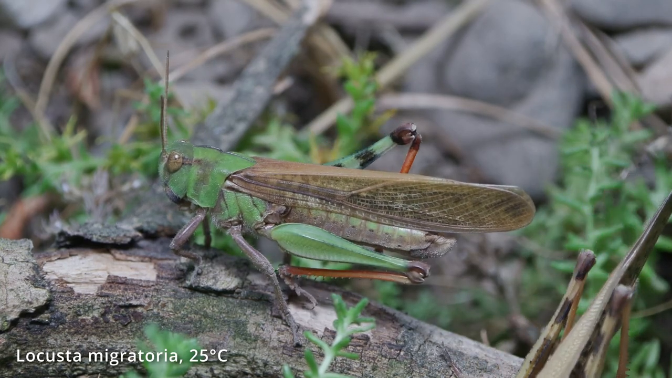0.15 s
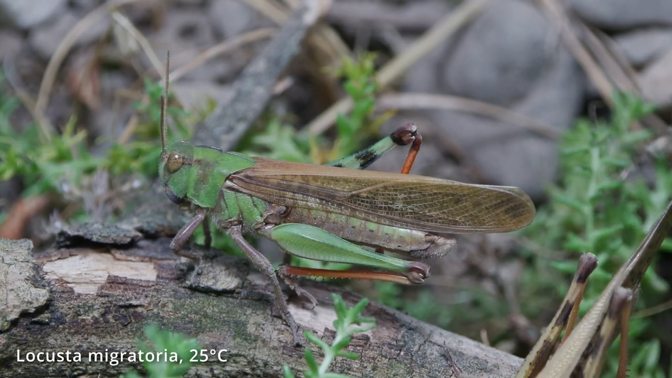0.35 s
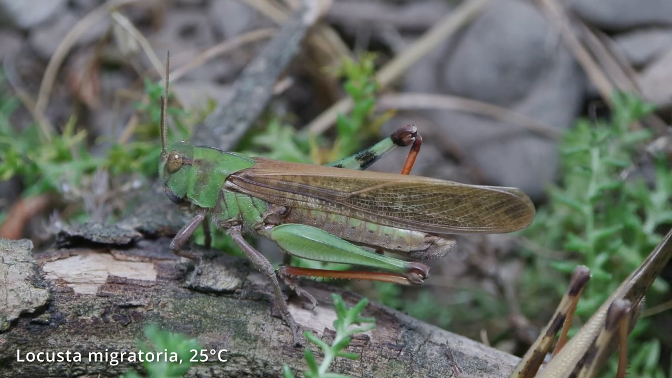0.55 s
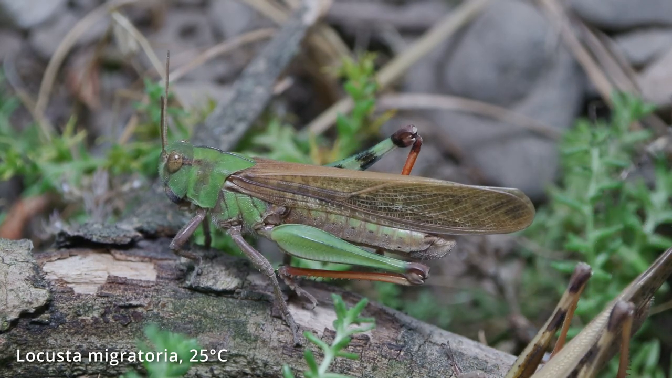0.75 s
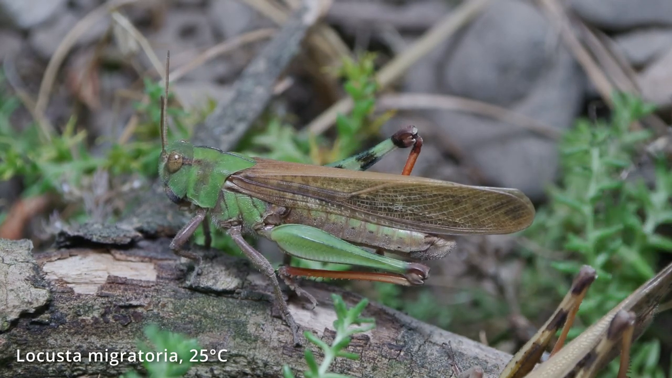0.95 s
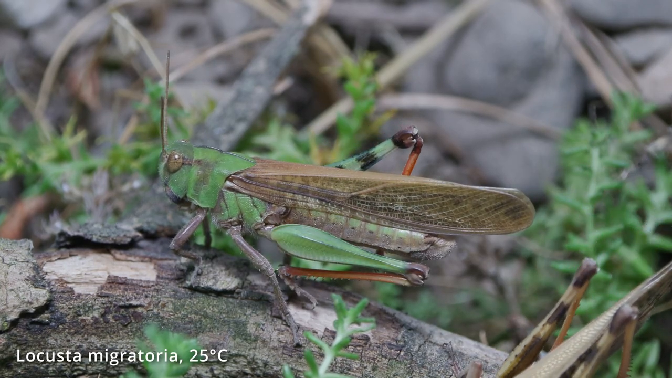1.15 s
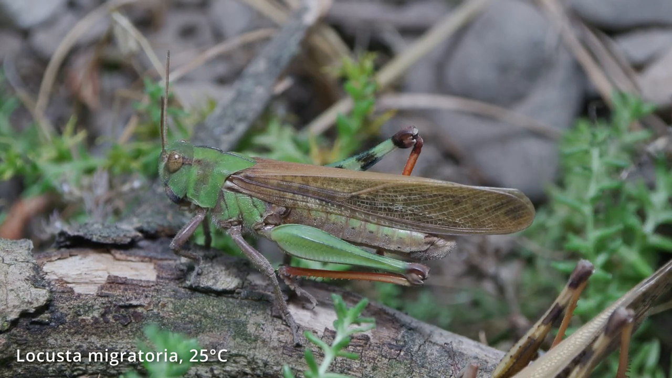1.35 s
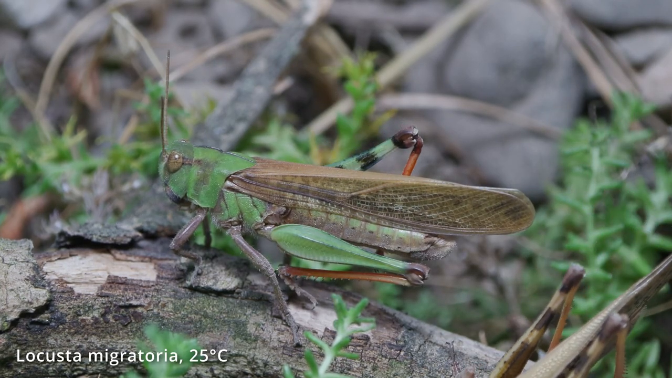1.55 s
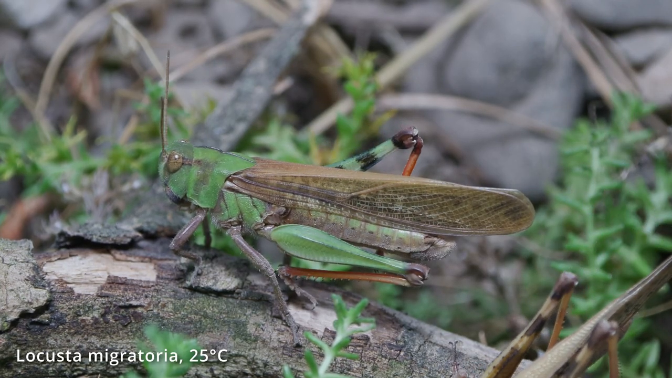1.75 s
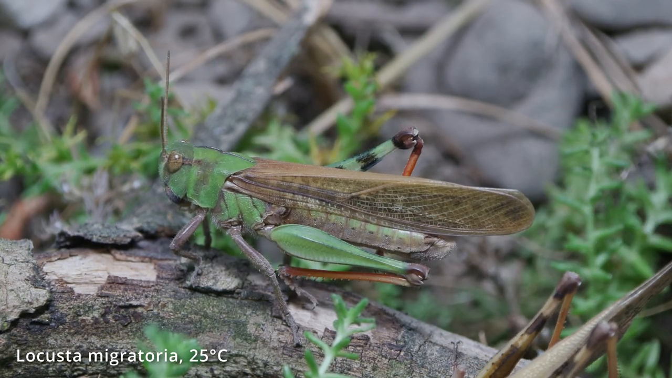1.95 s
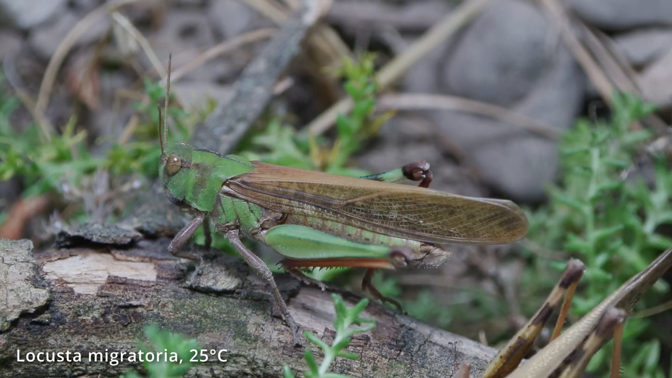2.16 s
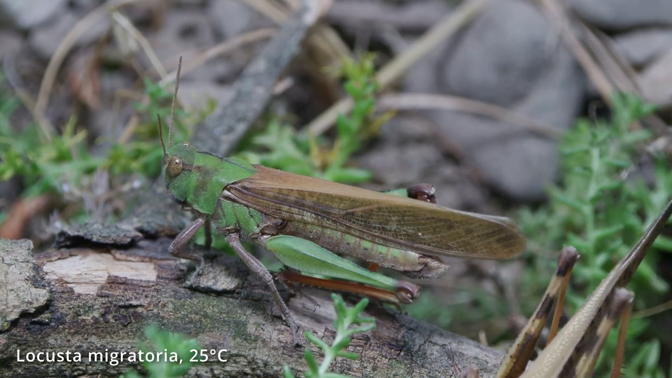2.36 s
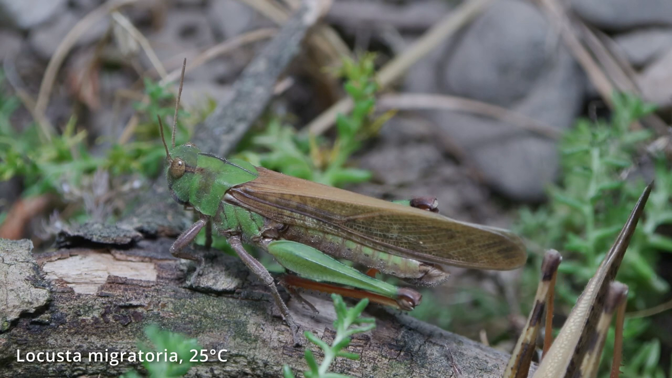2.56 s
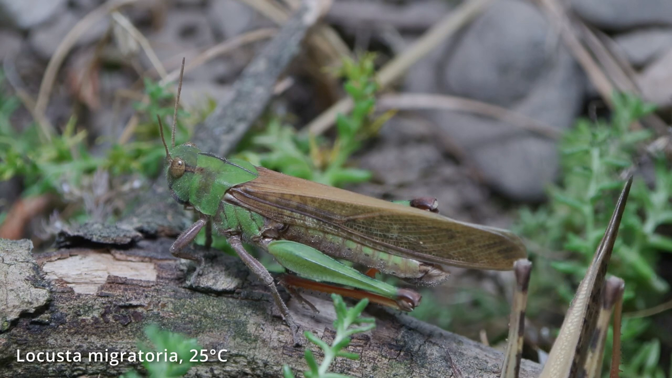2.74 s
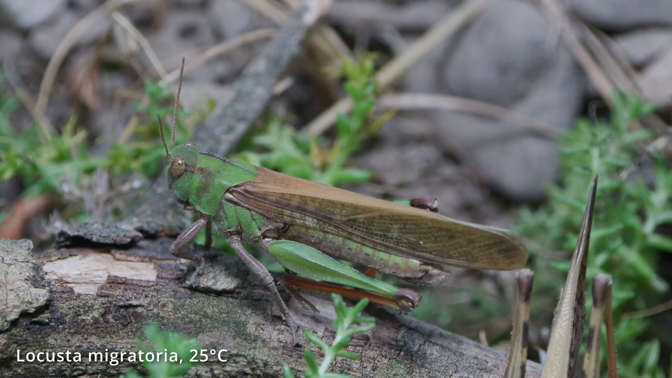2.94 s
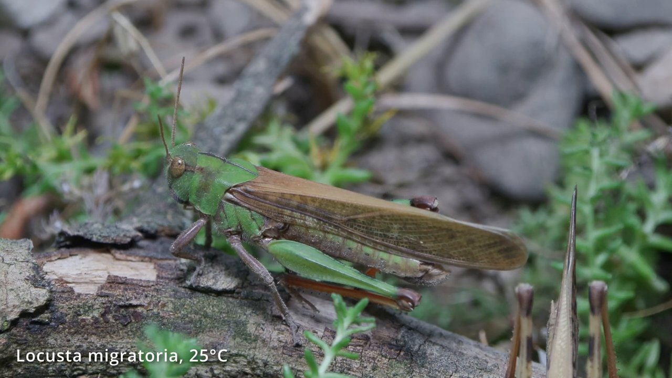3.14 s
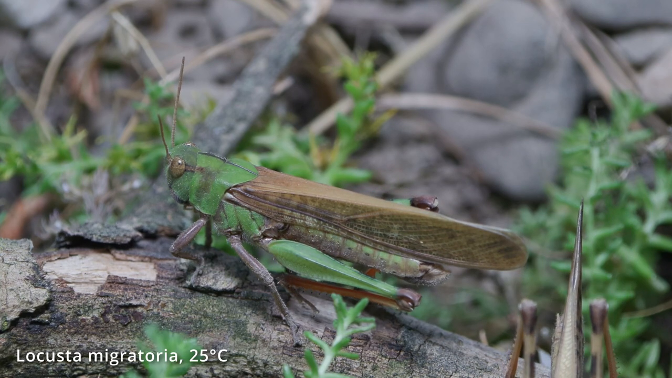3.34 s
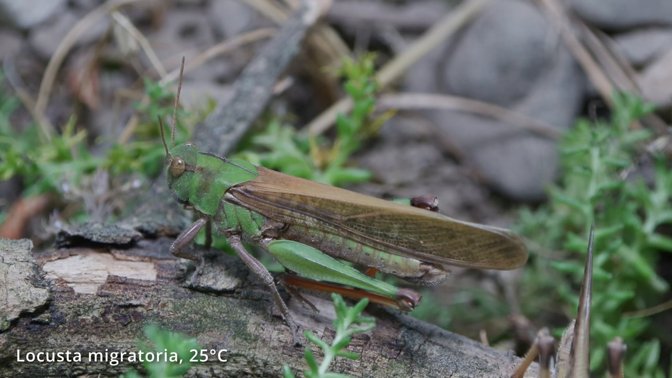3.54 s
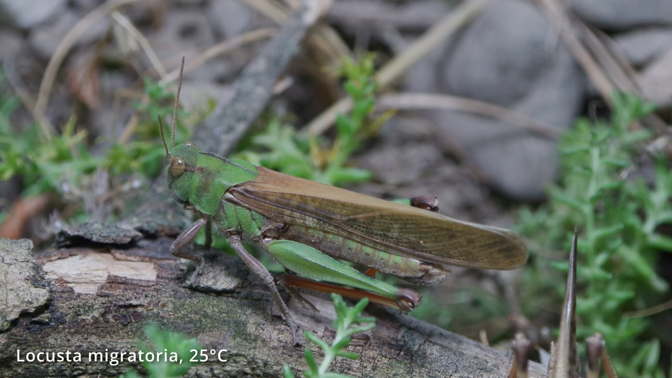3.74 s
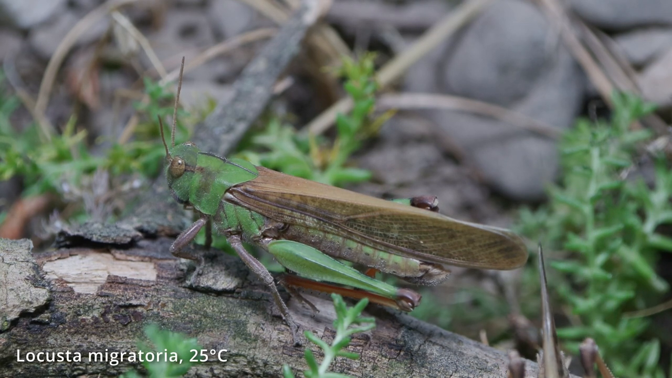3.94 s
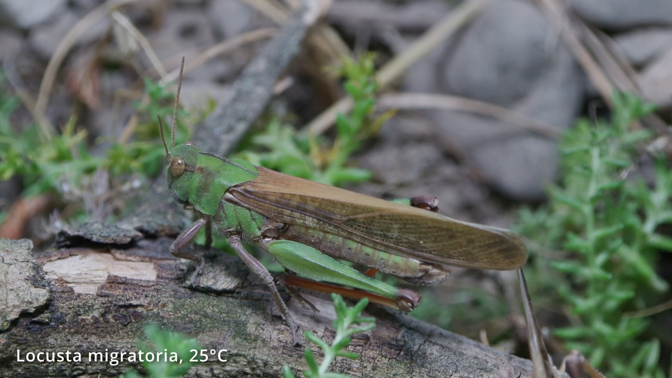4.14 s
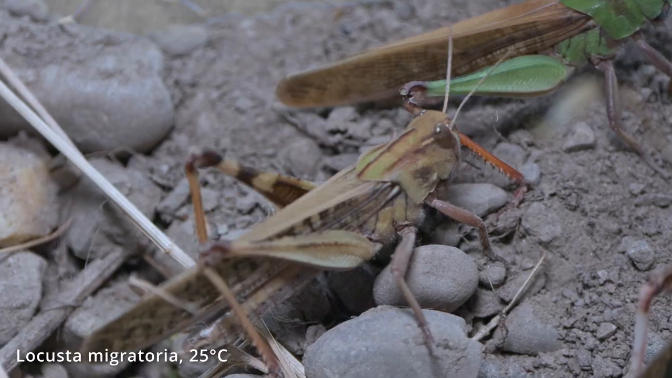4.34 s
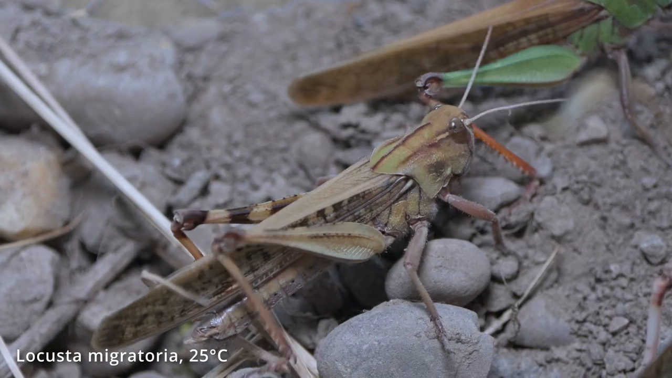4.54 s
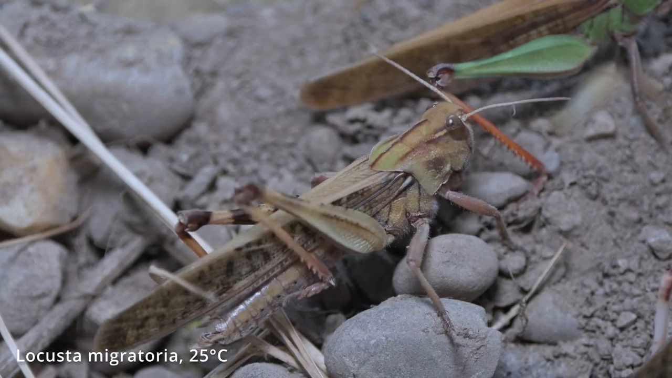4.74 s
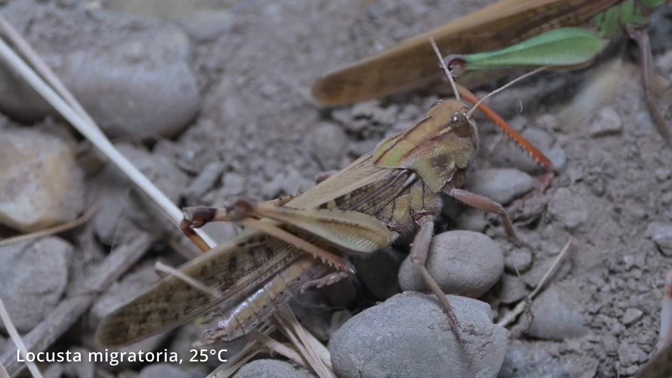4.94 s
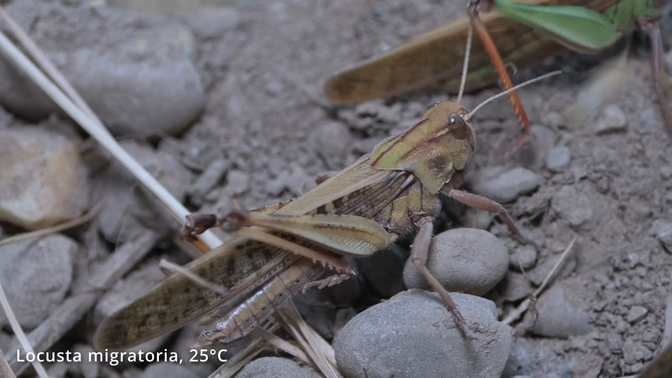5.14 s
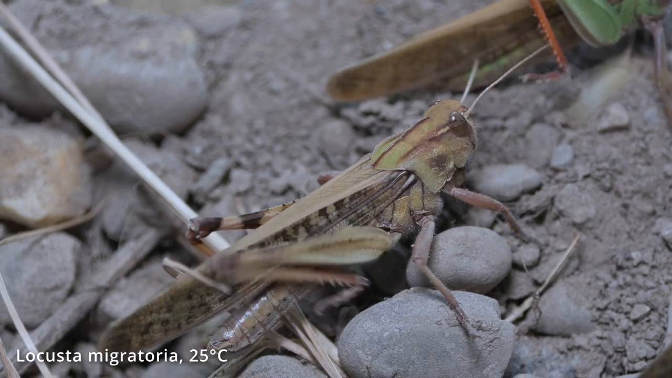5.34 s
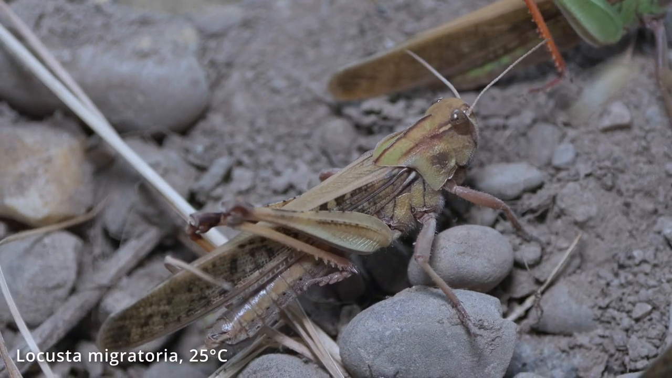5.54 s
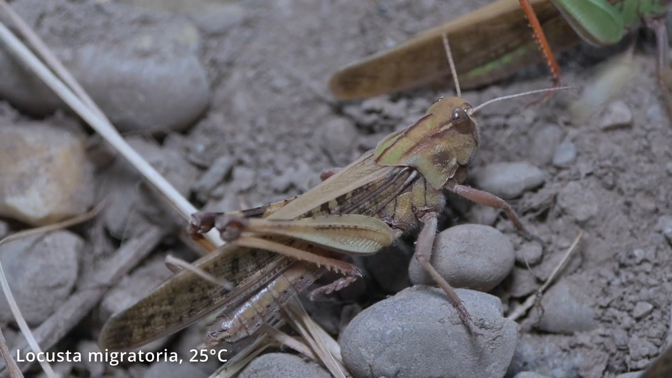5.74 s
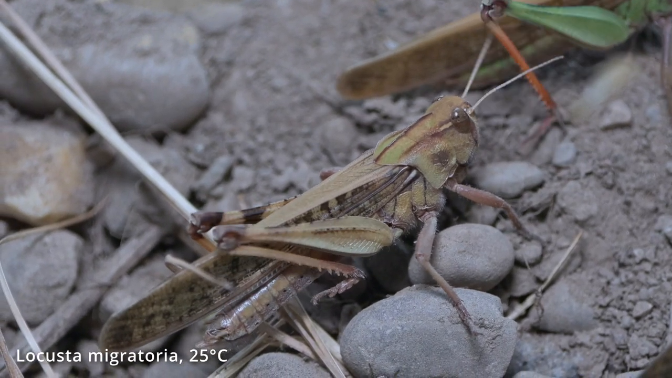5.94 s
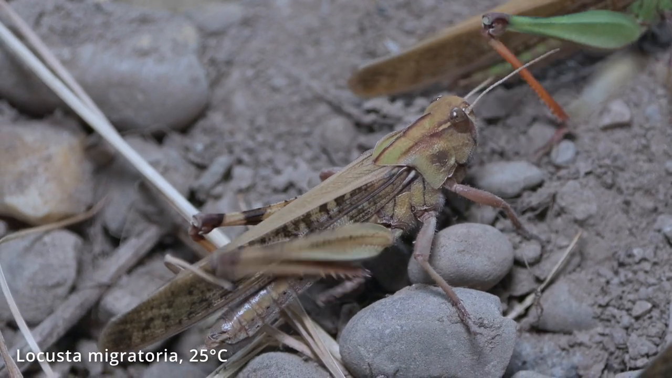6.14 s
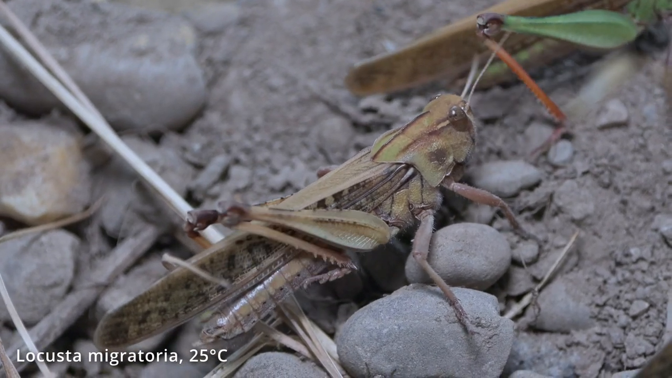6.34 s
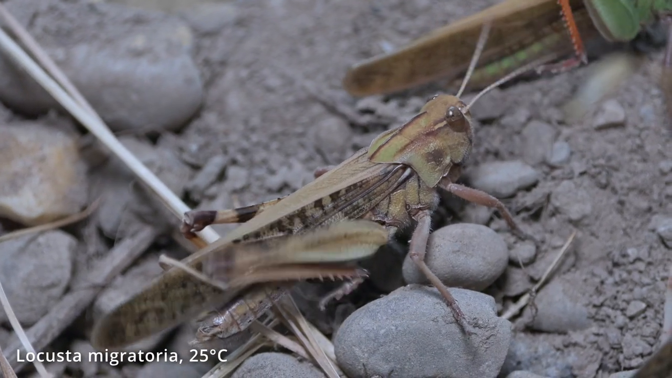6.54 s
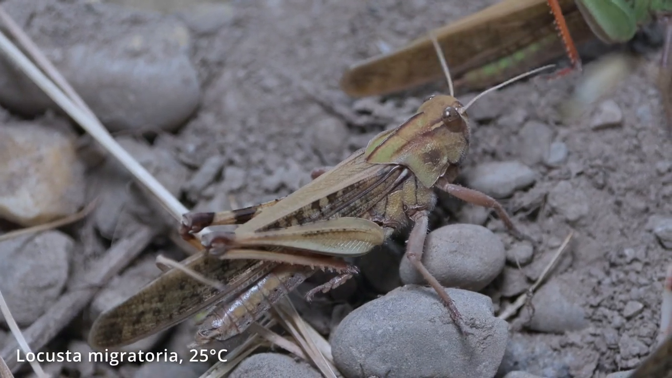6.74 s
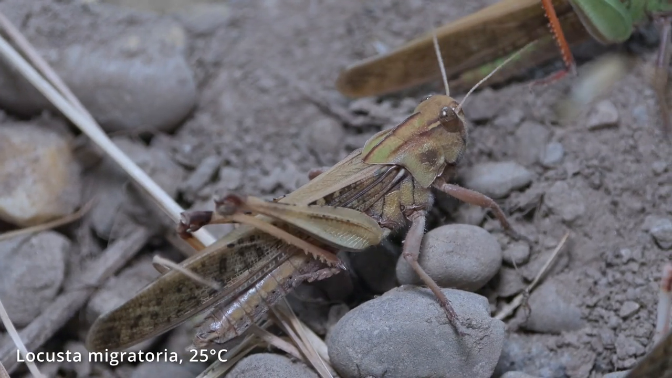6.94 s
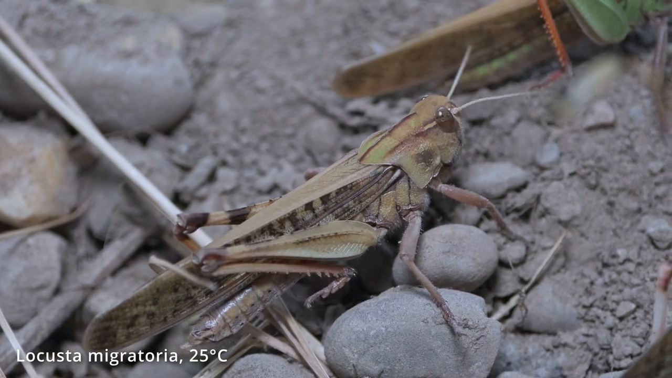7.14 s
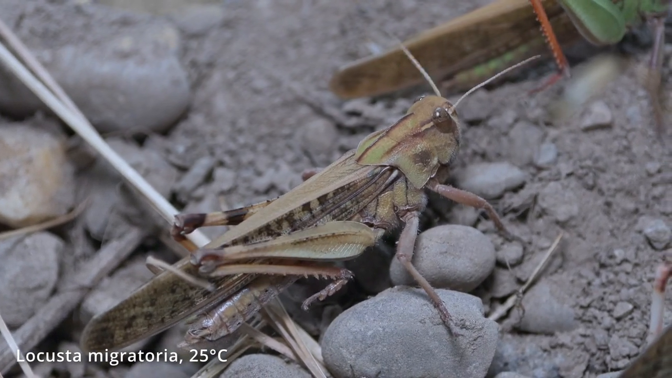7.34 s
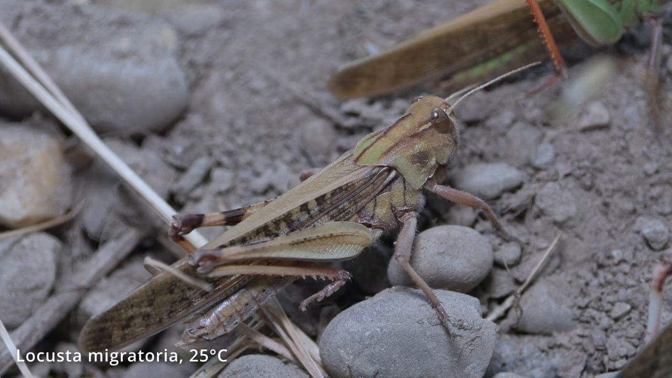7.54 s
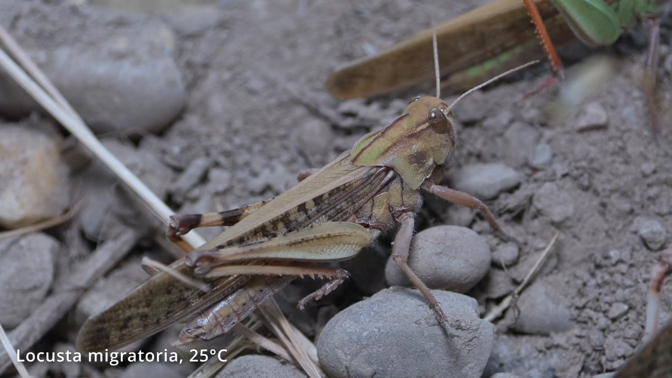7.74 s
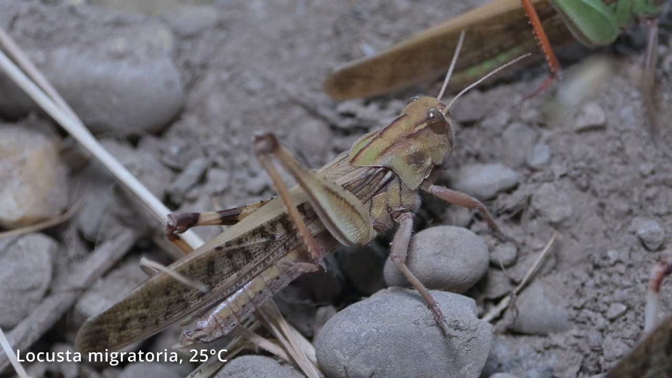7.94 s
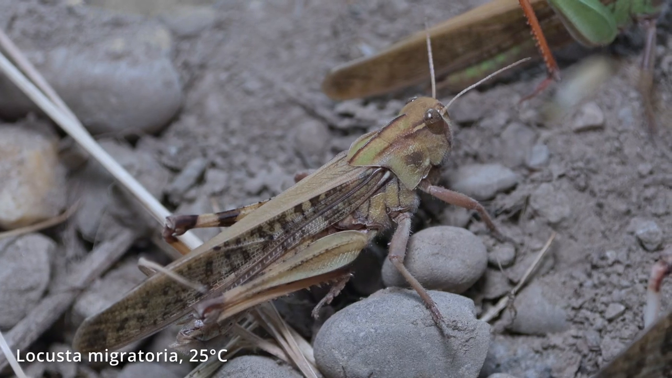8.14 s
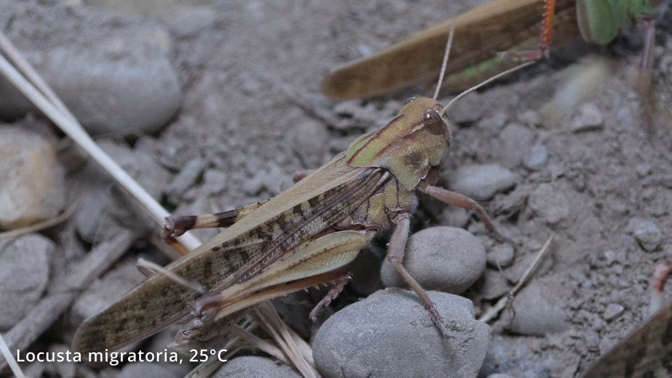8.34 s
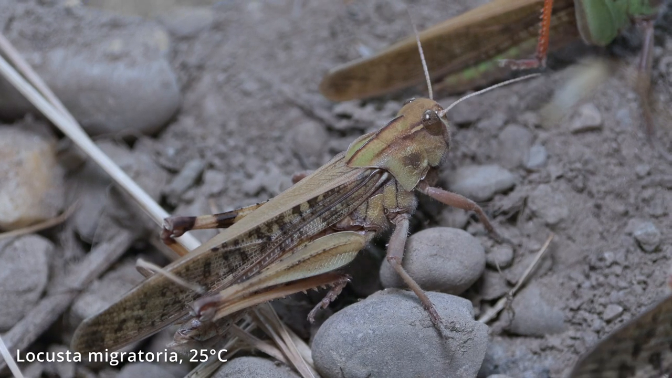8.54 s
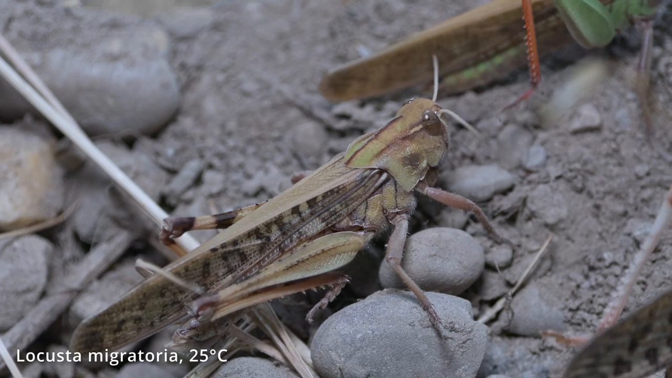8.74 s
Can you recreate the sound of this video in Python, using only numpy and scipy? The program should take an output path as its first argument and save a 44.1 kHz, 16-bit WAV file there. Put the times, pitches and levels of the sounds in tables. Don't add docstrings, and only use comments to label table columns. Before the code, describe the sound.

Four seconds of soft, echoing birdsong, with high fast trills, falling chips and thin whistles above a deep breeze and a faint drone. Then a grasshopper-like insect scrapes leg against wing right at the microphone: loud, dry, scratchy pulses roughly ten a second, in one longer burst and one shorter, uneven one. A bird sings a rapid repeated phrase in the gap; squeaky chirps and clear whistles finish.

```python
import sys
import numpy as np
from scipy import signal
from scipy.fft import rfft, irfft
from scipy.io import wavfile
from scipy.ndimage import uniform_filter1d, map_coordinates

SR = 44100
rng = np.random.default_rng(int(sys.argv[2]) if len(sys.argv) > 2 else 0)


def file_out(sig):
    cols = np.atleast_2d(sig).T
    lim = np.clip(cols, -1, 1)
    pcm = np.round(lim * 32767).astype(np.int16)
    wavfile.write(sys.argv[1], SR, pcm)


def nominal_scale(level):
    x = np.asarray(level, float) / 20
    return 10 ** x


N = 392032


def unit(x):
    return x / np.sqrt(np.mean(x ** 2) + 1e-20)


def along(points, hz):
    f, v = np.transpose(points)
    return np.interp(np.log(hz + 1), np.log(f + 1), v)


def curves(rows):
    s, level, *cols = np.transpose(rows)
    t = np.arange(N) / SR
    return [np.interp(t, s, level, -150, -150)] + [np.interp(t, s, c) for c in cols]


def wobble(rate):
    knots = rng.standard_normal(int(N * rate / SR) + 4)
    return map_coordinates(knots, [np.arange(N) * rate / SR])


def rush(spectrum, patchy_db):
    hz, _, z = signal.stft(rng.standard_normal(N), SR, nperseg=4096)
    colour = nominal_scale(along([(1, -120)] + spectrum, hz))
    x = signal.istft(z * colour[:, None], nperseg=4096)[1]
    z = signal.stft(x, nperseg=512)[2]
    field = uniform_filter1d(rng.standard_normal(z.shape), size=5, axis=0)
    field = uniform_filter1d(field, size=10, axis=1)
    return unit(signal.istft(z * nominal_scale(patchy_db * unit(field)), nperseg=512)[1][:N])


def add(out, s, piece):
    room = out[max(round(s * SR), 0):][:len(piece)]
    room += piece[:len(room)]


def voice(notes, edge, swell_db=0):
    hz, size = np.zeros(N), np.zeros(N)
    for s, length, a, b, c, db in notes:
        u = np.linspace(0, 1, round(length * SR))
        hz[round(s * SR):][:len(u)] = 0
        add(hz, s, a * (1 - u) * (1 - 2 * u) + 4 * b * u * (1 - u) + c * u * (2 * u - 1))
        add(size, s, nominal_scale(db + 5.0 + swell_db * (u - 3.0)) * np.abs(np.sin(np.pi * u)) ** edge)
    return 2 * np.pi * np.cumsum(hz) / SR, size


def whistles(notes, edge, flutter_db, waver, swell_db=0):
    throats = [voice(notes[k::4], edge, swell_db) for k in range(4)]
    return sum(size * nominal_scale(flutter_db * wobble(60)) * np.sin(turn + waver * wobble(70))
               for turn, size in throats)


def glides(rows):
    return [(s, length, a, (a + c) / 2 - 0.07 * abs(a - c), c, db) for s, length, a, c, db in rows]


def held(rows):
    return sorted((s, length, hz, hz, hz, db) for s, length, hz, db in rows)


def contours(shapes, calls, flutter_db=2.5, fade_s=0.0017):
    out = np.zeros(N)
    for shape in shapes:
        s, hz, db = np.transpose(shape)
        t = np.arange(s[0], s[-1], 1 / SR)
        pitch = uniform_filter1d(np.interp(t, s, hz), size=200, mode="nearest")
        tone = np.sin(2 * np.pi * np.cumsum(pitch) / SR)
        fade = np.clip(np.minimum(t - s[0], s[-1] - t) / fade_s, 0, 1)
        for at, gain_db in calls:
            add(out, at + s[0], fade * nominal_scale(np.interp(t, s, db) + gain_db) * tone)
    return out * nominal_scale(flutter_db * wobble(60))


def trill(rows, rate, fall_hz, duty):
    db, hz = curves(rows)
    beat = (rate * np.arange(N) / SR) % 1 - .5
    tone = np.sin(2 * np.pi * np.cumsum(hz - fall_hz * beat) / SR)
    pips = np.exp(-(beat / duty) ** 2) * tone
    return nominal_scale(db + 1.6 * wobble(rate)) * unit(pips)


def trees(x, t60):
    out, step, t = np.zeros(N + SR), SR // 3, np.arange(SR // 2) / SR
    for k in range(0, N, step):
        tail = rng.standard_normal(len(t)) * nominal_scale(-60 * t / t60) * (1 - np.exp(-t / 0.0062))
        add(out, k / SR, signal.fftconvolve(x[k:k + step], tail / np.linalg.norm(tail)))
    return out[:N]


# frequency in Hz, density in dB per Hz.
HISS_SPECTRUM = [(240, -31), (400, -7), (1100, -1), (2050, -6.5), (3480, -8), (8060, -21.5), (15000, -21.5),
                 (15700, -31), (16500, -39.5)]


def hiss():
    return nominal_scale(-71) * rush(HISS_SPECTRUM, patchy_db=.6)


# time in seconds, rumble in dB, distant drone in dB.
WIND = [
    [(0.0, -54, -62), (4.26, -54, -61.5)],
    [(4.27, -58, -68.5), (6.58, -60, -69), (8.89, -53.5, -69)],
]
# frequency in Hz, density in dB per Hz.
RUMBLE_SPECTRUM = [(12, -48), (20, -18), (39, 4), (59, 3.5), (81, -1.5), (114, -4.5), (250, -28.5),
                   (320, -45), (550, -120)]
DRONE_SPECTRUM = [(88, -26.5), (150, 2), (329, -11), (446, -9.5), (571, -12), (1130, -18.5), (1550, -29.5),
                  (2200, -38), (2860, -59.5), (4840, -120)]


def wind():
    rumble_db, drone_db = curves(WIND[0] + WIND[1])
    rumble = nominal_scale(rumble_db + 1.2 * wobble(5)) * rush(RUMBLE_SPECTRUM, patchy_db=.6)
    return rumble + nominal_scale(drone_db) * rush(DRONE_SPECTRUM, patchy_db=1.2)


# time in seconds, level in dB.
RUSTLE_LEVEL = [
    (3.23, -95.5),
    (3.26, -79),
    (3.42, -81),
    (3.47, -98),
]
# frequency in Hz, density in dB per Hz.
LEAF_SPECTRUM = [(4000, -24), (5000, 2.5), (8600, 0), (9100, 4), (9500, -32)]


def leaves():
    return nominal_scale(curves(RUSTLE_LEVEL)[0]) * rush(LEAF_SPECTRUM, patchy_db=1)


# time in seconds, level in dB.
CHORUS_LEVEL = [
    [(0, -69.5), (.7, -76), (1.5, -70.5), (2.1, -66.5), (3.1, -68), (3.5, -75.5), (4.6, -75)],
    [(7.12, -80), (8.89, -76)],
]
# frequency in Hz, density in dB per Hz.
CHORUS_SPECTRUM = [(1400, -31), (1800, -9.5), (2500, -1.5), (2950, 1), (3700, -4), (4100, -13.5),
                   (4700, -5), (5200, -31)]


def chorus():
    return nominal_scale(curves(CHORUS_LEVEL[0] + CHORUS_LEVEL[1])[0]) * rush(CHORUS_SPECTRUM, patchy_db=2.6)


FLOCK_PITCHES = [2500, 2900, 2950, 3350, 3600, 4200]


def flock(count):
    at, length, pick, fall, size = rng.random((count, 5)).T
    s = np.sort(3.6 * at)
    hz = np.take(FLOCK_PITCHES, (pick * len(FLOCK_PITCHES)).astype(int))
    hz = hz * (1 + .04 * (size - fall))
    db = np.interp(s, *np.transpose(CHORUS_LEVEL[0])) - 9.5 - 8 * size
    start_hz, end_hz = hz * (1 + .12 * fall ** 3), hz * (1 - .1 * fall ** 3)
    notes = np.transpose([s, .025 + .06 * length, start_hz, end_hz, db])
    return whistles(glides(notes), edge=.5, flutter_db=3, waver=1.5)


# time in seconds, level in dB.
WHEEZE_LEVEL = [
    (2.15, -83),
    (2.2, -74),
    (2.9, -70.5),
    (3.3, -76),
    (3.6, -81),
]
# frequency in Hz, density in dB per Hz.
WHEEZE_SPECTRUM = [(3700, -39), (4100, 0), (5000, -1.5), (6500, -8.5), (7800, -21), (8500, -44)]


def wheeze():
    return nominal_scale(curves(WHEEZE_LEVEL)[0] + 1.5 * wobble(25)) * rush(WHEEZE_SPECTRUM, patchy_db=1)


# start in seconds, length in seconds, start in Hz, end in Hz, level in dB.
FAR_GLIDES = [(0.001, 0.047, 3600, 3320, -71.5), (0.07, 0.065, 2890, 2480, -68),
              (0.128, 0.023, 2550, 2150, -75), (0.236, 0.04, 5350, 5150, -77.5),
              (0.308, 0.089, 4060, 3320, -72), (0.58, 0.065, 3930, 3330, -75.5),
              (0.62, 0.05, 3200, 2700, -75), (0.751, 0.064, 4730, 4330, -73),
              (0.988, 0.054, 3830, 3220, -72), (1.262, 0.04, 2715, 2100, -80),
              (1.3, 0.052, 2060, 2600, -77), (1.522, 0.03, 3800, 2930, -77), (1.65, 0.031, 4700, 4300, -86),
              (1.66, 0.029, 2500, 2050, -73), (1.69, 0.04, 2900, 2250, -77),
              (1.722, 0.022, 1800, 1650, -78), (1.745, 0.04, 4200, 3450, -77),
              (1.78, 0.041, 2900, 2050, -78), (1.88, 0.04, 4250, 4550, -76), (1.886, 0.06, 3850, 2150, -72),
              (1.91, 0.024, 3500, 3100, -83), (1.98, 0.036, 2920, 2600, -70.5),
              (2.018, 0.042, 2540, 1643, -71), (2.04, 0.049, 2500, 2270, -73),
              (2.1, 0.069, 2776, 2460, -71), (2.13, 0.04, 2310, 1690, -79)]
# start in seconds, length in seconds, pitch in Hz, level in dB.
FAR_NOTES = [(0.0, 0.033, 2695, -64), (0.15, 0.14, 2430, -85), (0.4, 0.09, 3650, -78),
             (0.43, 0.044, 3230, -69), (0.55, 0.12, 3600, -78), (0.68, 0.09, 2700, -78),
             (0.87, 0.06, 3590, -76), (1.07, 0.096, 3230, -78), (0.714, 0.043, 3510, -69.5),
             (0.83, 0.08, 2400, -77), (0.838, 0.063, 4470, -78), (1.045, 0.094, 2703, -72),
             (1.19, 0.1, 4670, -84), (1.33, 0.05, 4950, -75), (1.38, 0.075, 3470, -67),
             (1.464, 0.22, 4040, -69.5), (1.546, 0.15, 2885, -71), (1.55, 0.2, 4890, -86),
             (1.72, 0.04, 4220, -75), (1.79, 0.07, 4270, -82), (1.74, 0.08, 3230, -83),
             (1.84, 0.06, 2970, -84), (1.738, 0.1, 2920, -74), (1.752, 0.021, 1810, -73),
             (1.85, 0.045, 3880, -71), (1.92, 0.1, 3910, -75), (1.97, 0.043, 2100, -75),
             (2.2, 0.093, 3690, -74), (2.205, 0.063, 3290, -71), (2.27, 0.063, 3100, -74),
             (2.33, 0.26, 2960, -79), (2.5, 0.1, 2900, -73), (2.6, 0.22, 2950, -78), (2.82, 0.1, 3384, -75),
             (2.85, 0.1, 2914, -73), (2.68, 0.11, 4340, -79), (2.72, 0.1, 4155, -80),
             (2.88, 0.1, 4400, -81), (2.92, 0.2, 4220, -83), (3.15, 0.1, 4400, -80), (3.0, 0.35, 2850, -77),
             (3.43, 0.084, 2540, -75.5), (3.55, 0.08, 2600, -75.5), (3.508, 0.1, 3220, -74),
             (3.64, 0.085, 3150, -80), (3.75, 0.38, 4486, -81), (4.15, 0.1, 4450, -90),
             (3.85, 0.1, 3520, -83), (3.87, 0.09, 3340, -80), (3.95, 0.1, 3400, -79),
             (4.008, 0.2, 2557, -80.5)]


def far_whistles():
    out = nominal_scale(3.5) * whistles(glides(FAR_GLIDES), edge=.3, flutter_db=1.2, waver=.6)
    return out + nominal_scale(-1.5) * whistles(held(FAR_NOTES), edge=.35, flutter_db=3.5, waver=1.9)


# time from its start in seconds, pitch in Hz, level in dB.
CHIP_SHAPE = [
    (0, 3080, -70),
    (.008, 2500, -69),
    (.018, 1850, -65),
    (.024, 1580, -68),
]


def chips():
    starts = 2.195 + .1762 * np.arange(6)
    return contours([CHIP_SHAPE], [(s, 2) for s in starts], flutter_db=.8)


# time in seconds, level in dB, centre in Hz.
WARBLE_LEVEL = [
    (3.84, -84, 3440),
    (3.87, -76, 3380),
    (4.04, -80, 3400),
    (4.07, -86, 3400),
]


def warble():
    return trill(WARBLE_LEVEL, rate=49, fall_hz=700, duty=.22)


# time in seconds, level in dB, centre in Hz.
FAST_TRILL = [
    (1.3, -88, 5700),
    (1.4, -84, 5750),
    (1.85, -80, 5900),
    (1.95, -78.5, 6050),
    (2.9, -79.5, 6050),
    (3.08, -84, 6050),
]


def fast_trill():
    return trill(FAST_TRILL, rate=48.2, fall_hz=1700, duty=.16)


# time in seconds, level in dB, centre in Hz.
SLOW_TRILL = [
    (0, -87, 4770),
    (.6, -81, 4700),
    (1.25, -99, 4640),
]


def slow_trill():
    return trill(SLOW_TRILL, rate=14, fall_hz=1500, duty=.14)


# time in seconds, level in dB.
BUZZ_LEVEL = [
    (1.85, -90),
    (2.012, -70),
    (2.26, -85),
]


def buzz():
    band = rush([(6600, -40), (6900, 0), (7800, -2), (8400, -30)], patchy_db=1.5)
    return nominal_scale(curves(BUZZ_LEVEL)[0]) * unit(band * nominal_scale(1.6 * wobble(200)))


# time from its start in seconds, pitch in Hz, level in dB.
SONG_PHRASE = [
    [(-.001, 4760, -57.5), (.007, 6040, -65)],
    [(.004, 3820, -67), (.010, 4983, -53.5), (.017, 3820, -53.5), (.025, 2983, -43), (.033, 2410, -61)],
    [(.043, 1844, -64), (.05, 1800, -58), (.065, 2340, -55.5), (.074, 1797, -60.5), (.083, 1380, -65)],
]
SONG_TURNS_DB = [8.7, 8.1, 3.8, 5.3, 6.4, 6.5, 6.9]


def song():
    return contours(SONG_PHRASE, [(5.171 + k * .14, db) for k, db in enumerate(SONG_TURNS_DB)])


# start in seconds, length in seconds, start in Hz, end in Hz, level in dB.
NEAR_GLIDES = [(4.24, 0.027, 2300, 1830, -69), (4.258, 0.03, 2650, 2660, -67),
               (4.618, 0.045, 3740, 3350, -71), (6.155, 0.023, 7120, 7760, -69),
               (6.18, 0.025, 7740, 7070, -66.5), (7.54, 0.06, 2820, 2956, -77),
               (7.65, 0.05, 1404, 1244, -79), (7.83, 0.04, 3700, 3500, -81),
               (7.955, 0.035, 2450, 2740, -79), (8.408, 0.061, 2647, 3150, -73.5),
               (8.772, 0.052, 4000, 3850, -61)]
# start in seconds, length in seconds, pitch in Hz, level in dB.
NEAR_NOTES = [(4.154, 0.049, 1745, -74.5), (4.17, 0.048, 3600, -77), (4.39, 0.092, 3870, -76),
              (4.352, 0.067, 2850, -77), (4.43, 0.058, 4000, -77.5), (4.45, 0.07, 1890, -77),
              (7.1, 0.1, 4640, -85.5), (7.2, 0.061, 1890, -76), (7.215, 0.055, 2810, -77.5),
              (7.22, 0.035, 3800, -83), (7.535, 0.048, 1930, -78.5), (7.6, 0.077, 3010, -75.5),
              (7.99, 0.12, 2820, -80), (8.45, 0.063, 3360, -75), (8.2, 0.044, 1346, -72),
              (8.455, 0.067, 3166, -66.5), (8.6, 0.06, 3760, -82), (8.77, 0.032, 2260, -80),
              (8.771, 0.028, 1910, -78), (8.82, 0.053, 3800, -56)]
# time from its start in seconds, pitch in Hz, level in dB.
WHIT_SHAPE = [
    (0, 4700, -65.5),
    (.008, 5530, -61.5),
    (.02, 5250, -58.5),
    (.032, 4810, -61),
]
# start in seconds, gain in dB.
WHIT_CALLS = [
    (8.612, 2),
    (8.667, 5.5),
]
# time in seconds, pitch in Hz, level in dB.
SWOOP_SHAPE = [
    (4.703, 5500, -52),
    (4.72, 4850, -45),
    (4.733, 4450, -52),
    (4.742, 4300, -66),
]
# time in seconds, pitch in Hz, level in dB.
DIP_SHAPE = [
    (4.333, 4020, -72),
    (4.37, 3820, -66),
    (4.398, 3800, -65),
    (4.424, 4800, -66),
]


def near_whistles():
    out = whistles(glides(NEAR_GLIDES), edge=0.52, flutter_db=-4.0, waver=0.33)
    out += whistles(held(NEAR_NOTES), edge=.4, flutter_db=2.2, waver=1.1)
    out += contours([WHIT_SHAPE], WHIT_CALLS)
    return out + contours([SWOOP_SHAPE, DIP_SHAPE], [(0.00029, 0.00031)], flutter_db=1.0)


# time in seconds, pitch in Hz, level in dB.
HOOK_SHAPE = [
    (8.46, 1760, -79),
    (8.5, 2050, -74),
    (8.521, 2280, -58),
    (8.529, 2800, -70.5),
    (8.539, 2150, -75),
]


def hooked_whistle():
    return contours([HOOK_SHAPE], [(0.00035, 6.4)])


# start in seconds, length in seconds,
# top of the lower voice in Hz, lower level in dB, upper level in dB.
SQUEAK_CALLS = [
    [(7.285, 0.035, 4100, -82, -79), (7.705, 0.038, 3960, -75.5, -71.5), (8.115, 0.052, 3990, -73, -70),
     (8.684, 0.05, 4000, -81.5, -75)],
    [(7.347, 0.058, 4110, -63, -78), (7.775, 0.045, 3640, -66, -66.5), (8.192, 0.043, 3660, -62.5, -62.5),
     (8.75, 0.061, 3770, -63.5, -65)],
    [(7.526, 0.0095, 3524, -71, -71), (7.89, 0.012, 4130, -69.5, -69.5), (8.298, 0.02, 4054, -67, -64.5),
     (8.865, 0.012, 4070, -83, -70)],
    [(7.545, 0.026, 4100, -66.5, -64.5), (7.912, 0.03, 4200, -67, -67), (8.329, 0.019, 4175, -64, -64)],
]
# lower start and end as ratios to its top, delay of the upper voice in seconds,
# upper length and upper top as ratios to the lower's.
SQUEAK_ARCHES = [
    (.87, .93, -.004, 1.15, 1.23),
    (.84, .8, -.004, 1.28, 1.24),
    (.97, .92, 0, 1.2, 1.285),
    (.88, .86, .005, .8, 1.275),
]


def squeaker():
    lower, upper = [], []
    for calls, (start, end, delay, stretch, above) in zip(SQUEAK_CALLS, SQUEAK_ARCHES):
        rise, fall = start ** 0.94, end ** 0.94
        for s, length, hz, low_db, high_db in calls:
            top = above * hz
            lower.append((s, length, start * hz, hz, end * hz, low_db))
            upper.append((s + delay, stretch * length, rise * top, top, fall * top, high_db))
    low, a = voice(lower, edge=0.33)
    high, b = voice(upper, edge=0.16)
    low, high = low + .55 * wobble(500), high + .6 * wobble(500)
    own = np.sin(high) + nominal_scale(-20) * np.sin(high / 2) + nominal_scale(-26.0) * np.sin(3 * high / 2)
    mixed = nominal_scale(-19.0) * np.sin(low + high / 2) + nominal_scale(-33.0) * np.sin(low + high)
    return nominal_scale(3.8 * wobble(150)) * (a * np.sin(low) + b * own + np.sqrt(a * b) * mixed)


# frequency in Hz, density in dB per Hz.
INSECT_SPECTRUM = [(120, -11), (360, 1.5), (520, -8), (1250, -9.5), (1580, 3), (1850, -2.5), (2400, 2),
                   (4100, -17), (5300, 0), (7000, -4.5), (8600, -12), (10000, -10), (10800, -15),
                   (12300, -6.5), (15500, -16)]
INSECT_PARTS = {"thump": (195, 440), "body": (520, 4200), "wing": (4200, 7800), "top": (8300, 16000),
                "belly": (520, 830), "flank": (830, 1250), "plate": (1250, 1900), "ridge": (1900, 2600),
                "edge": (2600, 4200)}


def ringing(part):
    hz, (lo, hi) = np.fft.rfftfreq(2048, 1 / SR), INSECT_PARTS[part]
    steepness = 12 if part == "thump" else 24
    share = 1 / (1 + (lo / (hz + 1)) ** 12) / (1 + (hz / hi) ** steepness)
    gain = nominal_scale(along(INSECT_SPECTRUM, hz)) * np.sqrt(share)
    cep = irfft(np.log(np.maximum(gain, 1e-4)))
    cep[1:1024] *= 2
    cep[1025:] = 0
    return irfft(np.exp(rfft(cep)))[:1024]


RINGS = {part: ringing(part) for part in INSECT_PARTS}


def teeth(rate_hz, grip, jitter, grit):
    count = len(rate_hz)
    turn = 2 * np.pi * np.cumsum(rate_hz) / SR + jitter * np.cumsum(rng.standard_normal(count))
    unevenness = uniform_filter1d(rng.standard_normal(count), size=9)
    clicks = rng.standard_normal(count) * nominal_scale(12.0 * unevenness)
    return grip * (np.sin(turn) + 0.45 * np.sin(2 * turn)) + grit * clicks


def stroke(out, row, shape, late, rate_hz, grip, jitter, grit):
    s, ms, wing_db, *others = row
    lead = 600
    t = np.arange(-lead, 2400) / SR * 1000
    u = np.clip(t / ms, 0, 1)
    scrape = teeth(rate_hz(t, u), grip(t, u), jitter, grit)
    parts = "wing", "top", "thump", "belly", "flank", "plate", "ridge", "edge"
    for part, over_db, lean_db in zip(parts, [0] + others, late + 4 * late[-1:]):
        push = nominal_scale(shape(t, ms) + lean_db * (u - .5))
        jolt = .9 * nominal_scale(over_db) * (part == "thump")
        sound = signal.fftconvolve((scrape + jolt) * push, RINGS[part])[:len(t)]
        size = np.linalg.norm(sound[t < ms + 12]) / np.sqrt(ms * SR / 1000)
        add(out, s - lead / SR, nominal_scale(wing_db + over_db) * sound / size)


def rub(out, s, push, part):
    ring = RINGS[part]
    add(out, s, signal.fftconvolve(rng.standard_normal(len(push)) * push, ring) / np.linalg.norm(ring))


def body(db, lean_db, belly_db, tilt_db, ridge_db):
    belly, flank = belly_db - 2.5 - tilt_db / 2, belly_db - 2 + tilt_db / 2
    return db - 5 + np.array([belly, flank, -lean_db / 2, ridge_db, lean_db / 2])


def missed_db(wing_db):
    return np.clip(3 * (-43 - wing_db), 0, 13)


# start in seconds, length in ms, wing level in dB, speed as brightness in dB,
# body jolt in dB.
DOWN_STROKES = [(4.6572, 7.5, -25.5, -9.5, -9.5), (4.7421, 10.4, -25, 0.5, -9.5),
                (4.828, 10.2, -25, 1.5, -5), (4.929, 7.4, -22, 4, 4), (5.0461, 7.2, -23.5, 2, -7),
                (5.1558, 6.9, -25, -0.5, -5), (5.2686, 8.2, -24, -2.5, -9), (5.3787, 6.9, -22, -2.5, -8),
                (5.503, 5.36, -24, 2.5, -6), (5.631, 6.2, -23.5, 2.5, -4), (6.179, 6.5, -54, -13, 5.5),
                (6.264, 7.8, -29.5, -13, -11), (6.3492, 7.8, -22, -2, -5.5), (6.447, 6.7, -23.5, -4, -11),
                (6.5957, 8.8, -27.5, -9.5, -18.5), (6.6983, 6.2, -23.5, 2.1, -7),
                (6.846, 3.84, -53.5, -18, -13), (6.945, 8.7, -22.5, -1, -8.5)]
# lean from plate to edge in dB, belly level in dB.
DOWN_SEATS = [(-4.5, -3), (0.5, -2.5), (-3, -1), (0, -1), (-1, -12.5), (-6.5, -6.5), (-5.5, -5), (-2, -3.5),
              (3.5, -1), (-2, -1), (1, 2.5), (-5, 0.5), (-4.5, -4.5), (-4, -6), (-4, -7), (-0.5, -4),
              (2.5, -11), (-5, -7)]
DOWN_TILTS = [1.5, 2.5, -2, -0.5, -1, -3, -1.5, -1, 2, -1, -7, 3.5, 7, 10.5, 0.5, 3.5, 0, 1]


def down_strokes(out):
    def kick(t, ms):
        at = [-13, -2.4, -1.8, 0, 0.28 * ms, 0.54 * ms, 0.85 * ms, ms + 1, ms + 6, ms + 40]
        return np.interp(t, at, [-54, -43, -34.5, -13, -0.5, 1, -1.5, -17.5, -27.5, -86.5])

    for row, seat, tilt_db in zip(DOWN_STROKES, DOWN_SEATS, DOWN_TILTS):
        _, _, wing_db, speed_db, _ = row
        body_db = 6 + 0.57 * speed_db + missed_db(wing_db)
        ridge_db = 3.5 + 0.55 * max(speed_db, -3)
        fastest_hz = np.clip(17500 + 1100 * speed_db, 8500, 15000)
        stroke(out, (*row, *body(body_db, *seat, tilt_db, ridge_db)), kick, (-6.5, 11.0, -8.5, -3.5),
               lambda t, u: np.interp(u, [.18, .9], [4600, fastest_hz]),
               lambda t, u: np.sin(np.pi * u) ** 0.091, jitter=0.16, grit=0.92)


# start in seconds, length in ms, wing level in dB, drag leading into it in dB.
RETURN_STROKES = [(4.679, 12.7, -30.5, -37), (4.7664, 13.9, -25.5, -32.5), (4.8548, 12.1, -25.5, -35),
                  (4.9613, 10, -26.5, -31), (5.0803, 7.9, -30, -37), (5.193, 7.4, -30, -31),
                  (5.302, 7.9, -28.5, -42), (5.4121, 9.5, -29.5, -31.5), (5.533, 10.3, -27, -35),
                  (5.6644, 6.2, -31.5, -31), (6.215, 4.3, -41.5, -48), (6.2932, 8.4, -27.5, -36.5),
                  (6.3822, 6.5, -27, -32.5), (6.48, 8.1, -33, -31), (6.6193, 10.6, -26.5, -32.5),
                  (6.7284, 4.3, -48, -43.5), (6.8741, 9.2, -26.5, -34.5), (6.9694, 12.3, -27.5, -36.5)]
# lean from plate to edge in dB, belly in dB, jolt in dB.
RETURN_SEATS = [(1, -0.5, 4), (-2.5, -3.5, 3), (1.5, -1, -2), (-0.3, -0.5, -0.5), (-3, -14, 2.2),
                (8, -1.5, -1), (0.5, -6, 2.5), (0, -2, 2), (3, -8.5, 6.5), (7, -0.5, -8), (5, -3, -8),
                (-1, -0.5, 3.5), (-4.5, -4, 3), (-1, -0.5, 1), (4, -5, -0.5), (0.5, -16.5, -2.5),
                (1.5, -3, -3), (0, -3.5, -1.5)]
RETURN_TILTS = [-5.5, 0, 0.5, 1, 2, 3.5, -1, 0, 2.5, -0.5, -5, 3, 1.5, 1, 2, -1, -1, 2.5]


def return_strokes(out):
    def slide(t, ms):
        at = [-1.5, .4, 1.4, 4, ms, ms + 5, ms + 16, ms + 35]
        return np.interp(t, at, [-60.0, -17.5, -1.5, -5.0, -7.0, -21.5, -42.5, -65.0])

    rows = zip(RETURN_STROKES, RETURN_SEATS, RETURN_TILTS)
    for (s, ms, wing_db, _), (*seat, jolt_db), tilt_db in rows:
        parts = body(2.53 + missed_db(wing_db), *seat, tilt_db, 1.14)
        row = s, ms, wing_db, -9.5 + 0.41 * ms, -10 + jolt_db, *parts
        stroke(out, row, slide, (7.0, 7.0, -15.0, -8),
               lambda t, u: np.interp(t, [1, 4.5, 9, 18], [8090, 5852, 4400, 2600]),
               lambda t, u: np.exp(-np.abs(t / 9) ** 4.3), jitter=0.14, grit=0.91)


def drags(out):
    for (s, ms, down_db, *_), (turn, _, back_db, late_db) in zip(DOWN_STROKES, RETURN_STROKES):
        start = s + ms / 1000
        u = np.linspace(0, 1, round((turn - start) * SR) + 60)
        slips = nominal_scale(3.6 * np.repeat(rng.standard_normal(40), 50)[:len(u)])
        early_db, wing_db = down_db - 23.5, back_db - 13
        for part, from_db, to_db in (("body", early_db, late_db),
                                     ("thump", early_db - 6.5, late_db - 11.0),
                                     ("wing", early_db - 1.5, wing_db),
                                     ("top", early_db - 9.5, wing_db - 5.0)):
            rub(out, start, slips * nominal_scale(np.interp(u, [.4, .75], [from_db, to_db])), part)


# centre in seconds, half width in ms, level in dB.
LEG_BRUSHES = [
    (7.062, 15, -43.5),
    (5.803, 3.7, -63),
    (5.572, 4, -54.5),
    (6.652, 9, -52),
    (4.168, 1, -71),
]


def brushes(out):
    t = np.arange(-3000, 3000) / SR
    for s, ms, db in LEG_BRUSHES:
        swell = nominal_scale(db) * np.exp(-np.abs(t * 1000 / ms) ** 1.74)
        for part, under_db in (("wing", 0), ("body", -15), ("top", -24)):
            rub(out, s + t[0], nominal_scale(under_db) * swell, part)


def locust():
    out = np.zeros(N)
    down_strokes(out)
    return_strokes(out)
    drags(out)
    brushes(out)
    return out


def scene():
    background = hiss() + wind() + leaves() + chorus() + wheeze()
    far = far_whistles() + chips() + flock(count=110) + warble()
    fast, slow, sung = fast_trill(), slow_trill(), song()
    near, hook, squeaks = near_whistles(), hooked_whistle(), squeaker()
    bug = locust()
    echoes = nominal_scale(-0.5) * trees(far + slow + nominal_scale(-9.0) * fast, t60=0.76)
    echoes += nominal_scale(-6.0) * trees(sung, t60=0.9)
    echoes += nominal_scale(-5.0) * trees(near + nominal_scale(-8.0) * squeaks + nominal_scale(-9.5) * hook, t60=0.58)
    echoes += nominal_scale(-32.0) * trees(bug, t60=0.17)
    birds = far + fast + slow + near + hook + squeaks + sung + buzz()
    return (background + birds + echoes + bug)[None]


def low_pass(x):
    return signal.sosfilt(signal.butter(12, 16640, fs=SR, output="sos"), x)


def record(dry):
    rounded = dry / (1 + np.abs(dry / .8) ** 4) ** (1 / 4)
    band_limit = signal.ellip(8, .3, 70, 15750, fs=SR, output="sos")
    return low_pass(signal.sosfilt(band_limit, rounded))


dry = scene()
out = record(dry)
file_out(out)
```